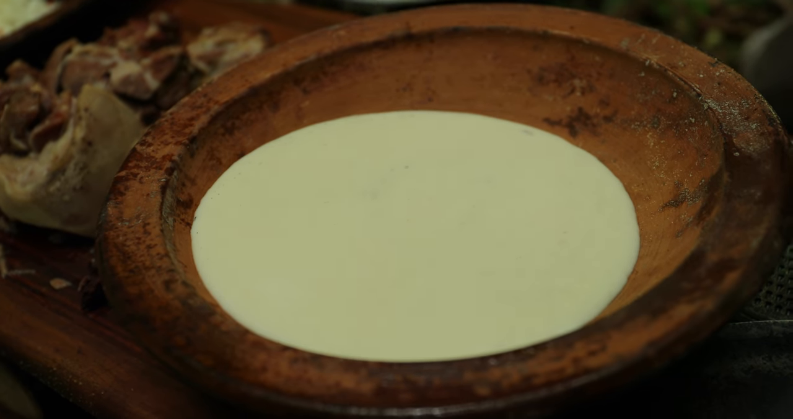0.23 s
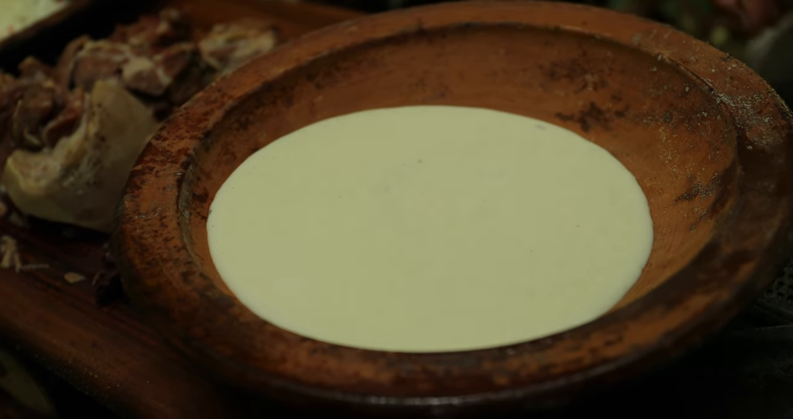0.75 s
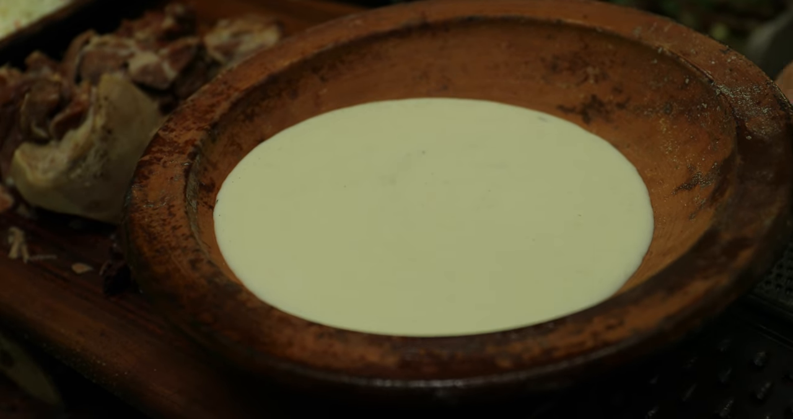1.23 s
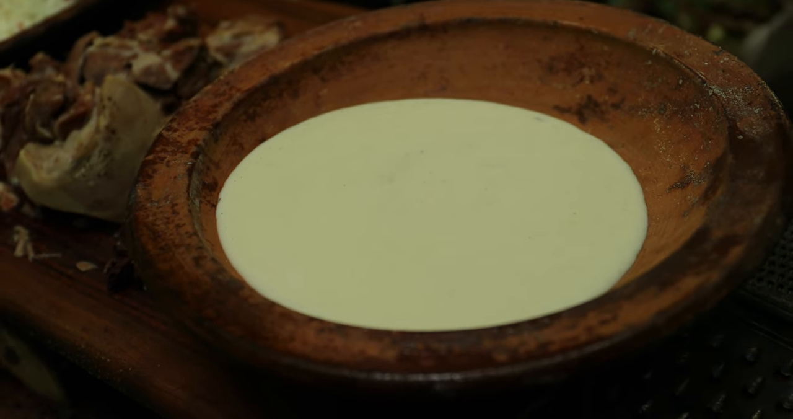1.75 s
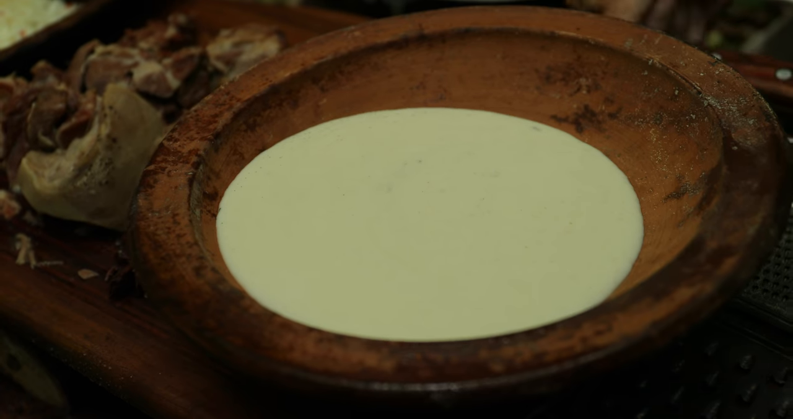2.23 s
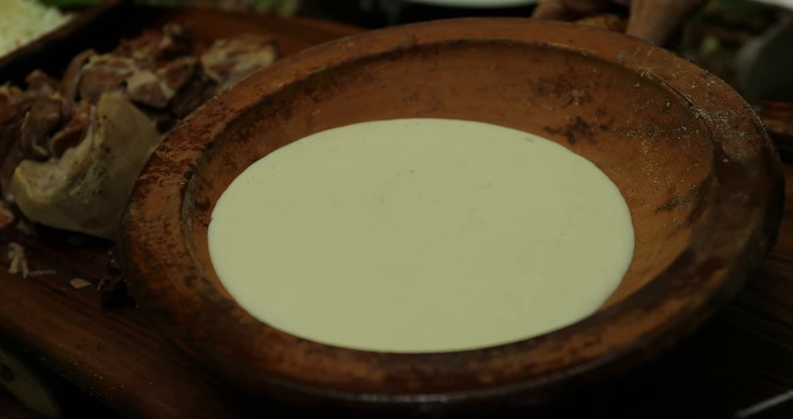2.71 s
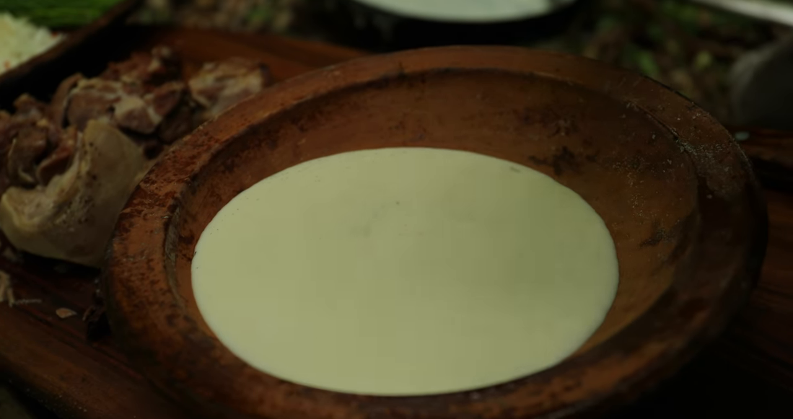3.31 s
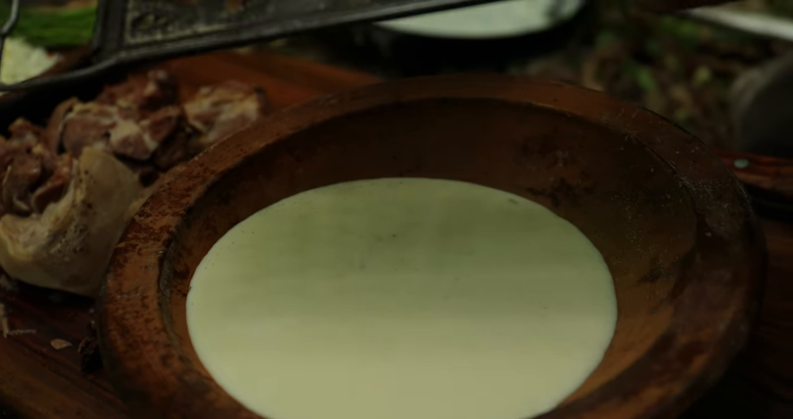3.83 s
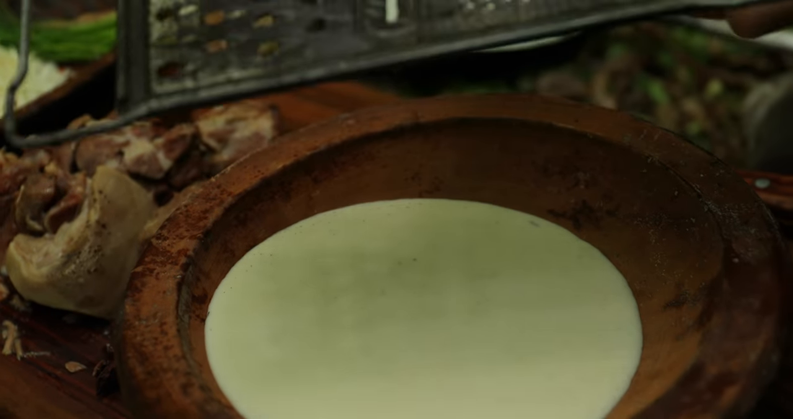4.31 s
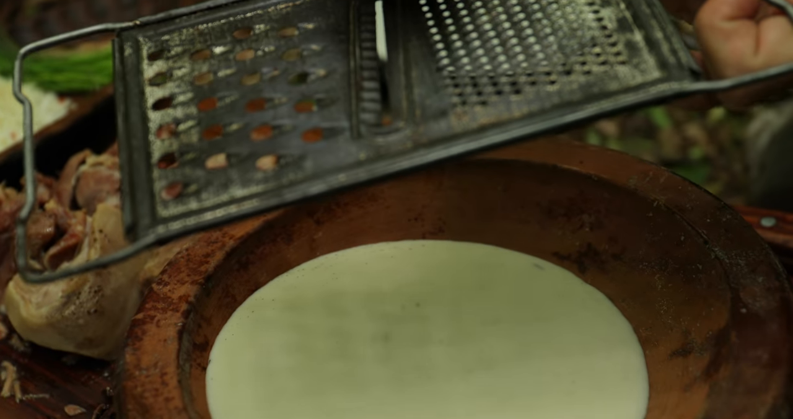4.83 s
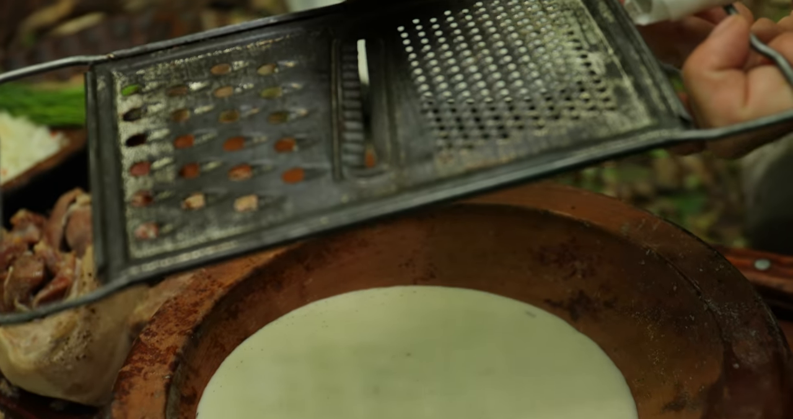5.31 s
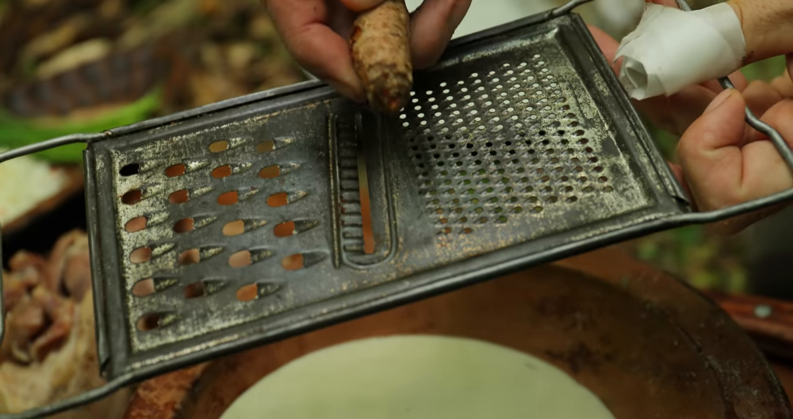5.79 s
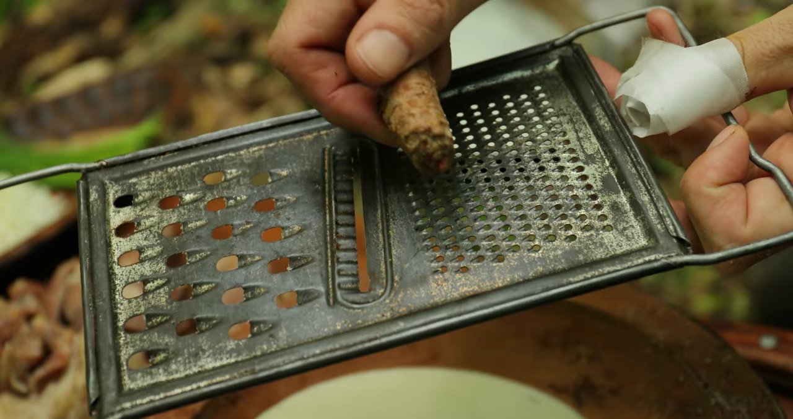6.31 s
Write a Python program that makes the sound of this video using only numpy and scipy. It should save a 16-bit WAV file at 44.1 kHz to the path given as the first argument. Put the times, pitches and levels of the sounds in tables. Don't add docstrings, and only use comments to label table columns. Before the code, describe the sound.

Outdoors at a wooden table, close stereo microphone. A clay dish thuds as a spoon clicks sharply on its rim. A metal pan then drags with a harsh, juddering, gritty scrape, and after a short gap is knocked, shoved and set down in clattering bursts with woody booms. Afterwards only soft air, faint birds, tiny drips and a low engine rumble remain.

```python
import sys
import numpy as np
from scipy import signal
from scipy.fft import rfft, irfft, next_fast_len
from scipy.io import wavfile
from scipy.ndimage import uniform_filter1d, minimum_filter1d, map_coordinates

SR = 44100
rng = np.random.default_rng(int(sys.argv[2]) if len(sys.argv) > 2 else 0)


def unload_audio(sound):
    columns = np.transpose(np.atleast_2d(sound))
    steps = np.round(np.clip(columns, -1, 1) * 32767)
    wavfile.write(sys.argv[1], SR, steps.astype(np.int16))


def boost_factor(decibels):
    exponent = np.asarray(decibels, float) / 20
    return 10 ** exponent


N = 288836
SIDES = np.array([[.5], [-.5]])


def unit(x):
    return x / np.sqrt(np.mean(x ** 2) + 1e-20)


def along(points, hz):
    point_hz, value = np.transpose(points)
    return np.interp(np.log(hz + 1), np.log(point_hz + 1), value)


def strength(rows):
    s, db = np.transpose(rows)
    return boost_factor(np.interp(np.arange(N) / SR, s, db, -150, -150))


def wobble(rate_hz):
    knots = rng.standard_normal(int(N * rate_hz / SR) + 4)
    return map_coordinates(knots, [np.arange(N) * rate_hz / SR])


def filtered(x, response):
    size = next_fast_len(x.shape[-1] + SR // 4)
    spectrum = rfft(x, size) * response(np.fft.rfftfreq(size, 1 / SR))
    return irfft(spectrum, size)[..., :x.shape[-1]]


def add(out, s, x):
    part = out[..., round(s * SR):][..., :x.shape[-1]]
    part += x[..., :part.shape[-1]]


def modes(table, low_hz, high_hz, scatter_db=0, damping=1.):
    mode_hz, width_hz, db = np.transpose(table)[:, :, None]
    gain = boost_factor(db + np.reshape(scatter_db, (-1, 1))) * (mode_hz >= low_hz) * (mode_hz < high_hz)
    gain = gain * (-1) ** np.arange(len(mode_hz))[:, None]

    def response(f):
        soft = 1 / (1 - (f / high_hz) ** 2 + 1.2j * f / high_hz) ** 2
        resonance = 1j * f * width_hz / (mode_hz * mode_hz - f * f + 1j * f * width_hz * damping)
        return soft * np.sum(gain * resonance, axis=0)
    return response


def echoes(x, t60_s):
    tail = rng.standard_normal((2, SR // 2)) * boost_factor(-60 * np.arange(SR // 2) / SR / t60_s)
    return signal.fftconvolve(x[None], tail / np.linalg.norm(tail[0]), axes=1)[:, :N]


# freq_hz, side_minus_mid_db
WIDTH = [(60, 0), (110, -16), (200, -14), (380, -15.5), (700, -11.5), (1290, -17), (2380, -8.5),
         (4400, -5.5), (8120, 0.5), (15000, 0.5)]
# freq_hz, left_minus_right_db
LEAN = [(60, 1.5), (110, -0.5), (200, -1.5), (380, -1), (700, 1), (1290, 1), (2380, 1), (4400, 1),
        (8120, 0), (15000, 1.0)]


def rush(spectrum, patchy_db):
    cells = signal.stft(rng.standard_normal((2, N)), nperseg=512)[2]
    field = rng.standard_normal(cells.shape[1:])
    field = uniform_filter1d(uniform_filter1d(field, 6, 0), 12, 1)
    pair = signal.istft(cells * boost_factor(patchy_db * unit(field)), nperseg=512)[1][:, :N]
    mid, side = filtered(pair, lambda hz: boost_factor(along(spectrum, hz)) * [hz ** 0, boost_factor(along(WIDTH, hz))])
    both = filtered(np.array([mid + side, mid - side]), lambda hz: boost_factor(along(LEAN, hz) * SIDES))
    return both / np.std(mid)


# time_s, strength_db
AIR = [(0, 2), (.31, 0), (.446, 5.5), (.62, 2), (1.4, 2.5), (1.8, 1.5), (2.0, 0.5), (2.95, 3.5), (3.68, 2),
       (4.3, 0), (4.7, 2.5), (5.4, -0.5), (6.2, 0), (6.36, 2), (6.55, 0)]
# freq_hz, level_db_per_hz
AIR_TONE = [(41, -67), (70, 1), (219, -8.5), (396, -14.5), (509, -20.5), (597, -21), (841, -25.5),
            (1240, -25.5), (1360, -23.5), (2290, -26), (3230, -30.5), (4980, -31), (13500, -45),
            (15900, -45)]
BREEZE_SHARE = [0.38, 0.72, 0.81]


def air():
    wide = rush(AIR_TONE, patchy_db=1.5)
    out, breeze = 0, strength(AIR)
    for share, low_hz, high_hz in zip(BREEZE_SHARE, (0, 800, 4000), (800, 4000, 20000)):
        part = filtered(wide, lambda hz: (hz >= low_hz) * (hz < high_hz))
        out = out + breeze ** share * boost_factor(0.44 * wobble(2.9)) * part
    return boost_factor(-42.5) * out


# time_s, level_db
HUM = [(0, -39), (.55, -50), (.64, -33), (.75, -47), (1.85, -44.5), (2.06, -31.5), (2.4, -50), (3.0, -37.5),
       (3.4, -50), (4.2, -38.5), (5.0, -54), (5.07, -20.5), (5.2, -40), (5.7, -35.5), (5.88, -15),
       (6.02, -35.5), (6.16, -32), (6.55, -54)]
HUM_HZ, HUM_WAVER_HZ, HUM_LEFT_DB = 56, 1.5, 3
DRONE_HZ, DRONE_WIDTH_HZ, DRONE_LEFT_DB, DRONE_DB = 41, 6.5, 6, -42


def engine():
    phase = 2 * np.pi * np.cumsum(HUM_HZ + HUM_WAVER_HZ * wobble(5.4)) / SR
    turn = .9 * wobble(2) * SIDES
    hum = strength(HUM) * boost_factor(1.5 + HUM_LEFT_DB * SIDES) * np.sin(phase + turn)
    hum = hum * boost_factor(2 - 5 * np.abs(wobble(4)))
    noise = rng.standard_normal((2, N))
    fuzz = filtered(noise, lambda f: np.exp(-((f - DRONE_HZ) / DRONE_WIDTH_HZ) ** 2))
    return hum + boost_factor(DRONE_DB + DRONE_LEFT_DB * SIDES) * unit(fuzz)


# start_s, peak_db, pitch_hz
DRIPS = [(0.339, -40.5, 1310), (0.73, -34, 1150), (1.391, -41, 1165), (1.479, -44, 1136),
         (1.557, -38, 1890), (4.319, -48, 1690), (4.474, -41, 1160), (4.601, -41, 1065), (4.485, -42, 1170),
         (4.6, -43, 1480), (4.65, -41, 1780), (4.71, -43.5, 936), (4.215, -43, 2340), (.1, -40.5, 1190),
         (4.789, -46, 2290), (4.88, -44, 880), (4.99, -43, 1090), (5.219, -46, 1430), (5.434, -51, 670),
         (5.605, -52, 670), (5.52, -45, 1390), (6.015, -50, 740), (5.205, -45, 700), (5.699, -50, 600),
         (5.857, -46, 1260), (5.889, -53, 710), (5.999, -47, 1210), (6.135, -45, 1020), (6.251, -46, 830),
         (6.289, -43.5, 712), (6.405, -43.5, 1330)]
PATTER_FROM_S, PATTER_PER_S, PATTER_HZ, PATTER_DB = 4.2, 45, 1150, -56


def drips():
    out, t = np.zeros(N), np.arange(SR // 12) / SR
    patter_s = N / SR - PATTER_FROM_S
    draw = rng.random((round(patter_s * PATTER_PER_S), 3))
    start_s = PATTER_FROM_S + draw[:, 0] * patter_s
    level_db = PATTER_DB + 9 * draw[:, 1] ** 2
    pitch_hz = PATTER_HZ * 2 ** (2.4 * draw[:, 2] - 1)
    for s, db, hz in DRIPS + list(zip(start_s, level_db, pitch_hz)):
        life_s = 9 / hz
        shape = np.exp(-t / life_s) * (1 - np.exp(-t / 0.00056))
        add(out, s, boost_factor(db + 1) * shape * np.sin(2 * np.pi * hz * t * (1 + .015 * t / life_s)))
    return out


# freq_hz, level_db, t60_s
FOOT = [(600, 3, 0.022), (1306, -6.5, 0.037), (406, -7, 0.026), (880, -3, .018)]
FOOT_S, FOOT_DB = .2122, -4.5


def foot():
    t = np.maximum(np.arange(N) / SR - FOOT_S, 0)
    ring = sum(boost_factor(db - 60 * t / t60) * np.sin(2 * np.pi * hz * t) for hz, db, t60 in FOOT)
    return boost_factor(FOOT_DB) * (1 - np.exp(-t / 0.00079)) * ring


# start_s, peak_db, freq_hz,
# left_minus_right_db, fade_s
TICKS = [(0.2128, -19, 5760, 8, 0.011), (2.489, -32, 6200, 1, 0.0051), (0.302, -38.5, 6000, 1.5, 0.019),
         (.419, -34.5, 9000, 1.5, 0.021), (0.451, -29, 8000, 3, 0.0081), (0.582, -30, 5200, 2, 0.0046),
         (1.514, -34, 10900, -3, 0.0024), (1.678, -29.5, 10500, 3, 0.0013), (3.45, -41, 13000, 1, .003),
         (3.802, -50, 9000, -20, 0.043), (4.381, -33.5, 4970, 7, 0.004), (4.805, -31, 13500, -2, 0.0018),
         (5.305, -50, 10500, 38, 0.002), (5.694, -27, 10500, 0, 0.0015), (3.74, -47, 9000, -6, 0.011),
         (3.85, -52, 9100, 0, .015), (3.97, -53, 8900, 6, 0.011), (6.275, -37, 3030, 3, 0.028)]


def ticks():
    out, t = np.zeros((2, N)), np.arange(SR // 20) / SR
    for s, db, hz, pan_db, fade_s in TICKS:
        burst = rng.standard_normal((2, len(t))) * np.exp(-t / abs(fade_s))
        snap = filtered(burst, lambda f: (1j * f * hz / (hz * hz - f * f + 1.1j * f * hz)) ** 2)
        add(out, s, boost_factor(db + pan_db * SIDES) * snap / np.abs(snap).max())
    return out


# freq_hz, level_db, t60_s
RIM = [(1330, -8, 0.041), (1430, -11.5, 0.086), (1500, 1.5, 0.024), (1696, -24, 0.27), (2050, -5, 0.019),
       (2350, -12.5, 0.051), (2280, -28, 0.27), (2470, -28, 0.16), (2800, -22, 0.025), (2970, -22, 0.049),
       (4900, -27, 0.037)]
# start_s, peak_db
SPOON = [
    (0.2222, -3),
    (0.2292, -20),
    (0.2338, -24),
]
HUSH_S, HUSH_DB_PER_S = 0.308, 700


def spoon():
    out, t = np.zeros(N), np.arange(SR // 3) / SR
    for s, db in SPOON:
        ring = sum(boost_factor(level - 60 * t / t60) * np.sin(2 * np.pi * hz * t) for hz, level, t60 in RIM)
        crack = 0.022 * boost_factor(-60 * t / 0.021) * rng.standard_normal(len(t))
        add(out, s, boost_factor(db + 3) * (ring * (1 - np.exp(-t / .0008)) + crack))
    return out * boost_factor(-HUSH_DB_PER_S * np.maximum(np.arange(N) / SR - HUSH_S, 0))


# freq_hz, width_hz, level_db
PAN = [(326, 34, -3), (514, 31, -7.5), (860, 30, -11), (1210, 51, -11), (1590, 110, 2), (2100, 123, -0.5),
       (2585, 340, -8), (2846, 36, -4), (3140, 105, -5), (3760, 40, -0.5), (4200, 180, -14),
       (4600, 130, -5.5), (4820, 42, 1.5), (5030, 52, -4), (6030, 95, -1.5), (6700, 160, -7.5),
       (7400, 53, -5.5), (7750, 180, -9.5), (5670, 48, -9.5)]
CONTACT_SCATTER_DB, CONTACT_MOVES_HZ = 4, 22


def sliding(grit, band, damping):
    share = boost_factor(8 * np.array([wobble(CONTACT_MOVES_HZ) for _ in range(3)]))
    share = share / np.linalg.norm(share, axis=0)
    spots_db = CONTACT_SCATTER_DB * rng.standard_normal((3, len(PAN)))
    out = 0
    for gain, spot_db in zip(share, spots_db):
        out = out + unit(filtered(gain * grit, modes(PAN, *band, spot_db - spot_db.mean(), damping)))
    return out / np.sqrt(3)


# low_hz, high_hz
BANDS = [(0, 1500), (1500, 3500), (3500, 9000)]
# freq_hz, level_db_per_hz
GRIT = [(1500, -36), (2500, -9), (4000, 21), (6500, 19), (8000, 20), (12000, 7), (15600, -3), (16500, -50)]
# time_s, pressure_db, speed (0-1)
DRAG = [
    (0.66, -46.5, 1),
    (0.738, -50.5, 0),
    (0.848, -39.5, 0.55),
    (0.9, -35.5, 0.54),
    (0.975, -22, 0.31),
    (1.048, -27, 0.54),
    (1.116, -28, 0.73),
    (1.2, -32.5, 0.81),
    (1.248, -37.5, 0.57),
]
# start_s, length_s, pressure_db, speed (0-1)
SHOVES = [
    (2.008, 0.14, -26.5, 0),
    (2.281, 0.16, -25.5, 0.03),
    (2.477, 0.1, -32, 0.04),
    (2.676, 0.22, -31, 0),
]
SHOVE_RISE_S, SHOVE_FALL_DB = 0.064, 17
# time_s, extra_scratch_db, fade_s
BITES = [
    (.911, 12, .006),
    (0.966, 20, .003),
    (1.024, 8, 0.0065),
    (1.038, 7, .012),
    (1.066, -6, .01),
    (1.099, 5, 0.01),
    (1.131, 1, 0.017),
    (1.19, 7, 0.015),
    (1.24, 8.5, .006),
]
LIFT_DB_PER_S = [350, 500, 1500, 2000]
RESTING_DB = [1, -8, -23, -51]
FASTER_DB = [-3.5, 6, 23, 55]


def drag():
    slow, fine = wobble(40), wobble(350)
    clumps = boost_factor([slow + 3.3 * np.roll(fine, 5000 * k) for k in range(4)])
    grit = clumps * rng.standard_normal((4, N))
    rings = [unit(sliding(grit[k], band, damping=0.82 + 0.089 * k * k)) for k, band in enumerate(BANDS)]
    scratch = unit(filtered(grit[3], lambda hz: boost_factor(along(GRIT, hz))))
    rings[2] = unit(rings[2] + scratch)
    rings.append(0.35 * unit(filtered(scratch, lambda hz: (hz / 12000) ** 2)))
    strokes = [DRAG]
    for s, length, db, speed in SHOVES:
        strokes.append([(s, db - 8.5, speed), (s + SHOVE_RISE_S, db, speed),
                        (s + length, db - SHOVE_FALL_DB, speed)])
    level, t = 0, np.arange(N) / SR
    for stroke in strokes:
        s, db, speed = np.transpose(stroke)
        lift_db = np.c_[LIFT_DB_PER_S] * np.maximum(t - s[-1], 0)
        pressure_db = np.interp(t, s, db, left=-150) - lift_db
        speed_db = np.c_[RESTING_DB] + np.c_[FASTER_DB] * np.interp(t, s, speed)
        level = level + boost_factor(pressure_db + speed_db)
    bite = 1
    for s, db, fade_s in BITES:
        bite = bite + boost_factor(db) * (t >= s) * np.exp(-np.abs(t - s) / abs(fade_s))
    return np.sum(level * rings * [t ** 0, t ** 0, bite, bite], axis=0)


# freq_hz, width_hz, level_db
BOARD = [(271, 63, 4.5), (520, 70, -3.5), (738, 26, 3), (900, 41, -5.5), (1098, 57, -4), (1310, 41, -5.5),
         (1542, 25, -10)]
# start_s, peak_db, hardness_db, favoured_hz
KNOCKS = [(0.664, -29, -6, 480), (2.01, -21.5, -14.5, 910), (2.042, -27, -18, 480),
          (2.057, -18, -10.5, 1500), (2.068, -16, -20, 328), (2.075, -18, -15, 1190),
          (2.092, -17.5, -20, 720), (2.108, -21, -18, 1110), (2.284, -13.5, 1.5, 506),
          (2.302, -12.5, -7, 920), (2.3442, -18, 6.5, 686), (2.359, -24, -1, 900), (2.364, -2.5, -30, 738),
          (2.396, -22, -11.5, 890), (2.482, -5, -38, 770), (2.5, -10.5, -17.5, 730), (2.521, -19, -15, 501),
          (2.541, -24, -46, 730), (2.6892, -15.5, -6, 900), (2.703, -4.5, -18, 600),
          (2.711, -3.5, -30, 560), (2.7504, -18, -4, 490), (2.784, -3.5, -41, 520), (2.808, -4.5, -31, 700),
          (2.815, -9, -36, 514), (2.874, -22.5, -36, 320), (2.884, -24, -26, 630), (3.801, -35, -1, 970)]
# start_s, peak_db, upper_modes_db, edge_db, favoured_hz
JUDDER = [(0.82, -30, -5, -6, 710), (0.88, -32, -17, -11, 710), (0.897, -38, 2, -1, 1130),
          (0.911, -21, 1.5, 5, 1130), (0.939, -15, 0, -12, 860), (0.9436, -16.5, 4.5, -5, 340),
          (.955, -16, 0, -6, 1200), (.992, -21.5, 3, -1, 1200), (0.9664, -17, 3, 7.5, 860),
          (0.98, -17, 5, -4, 450), (1.015, -19, 4, -5, 496), (1.039, -24, -2, 1, 527),
          (1.07, -27, -11, -6, 525), (1.098, -32, -2, 10.5, 530), (1.135, -37, 10, 19, 536),
          (1.164, -46, 0, 6, 490), (1.19, -41, 12, -1, 1180), (1.245, -27, -22, -16, 1100)]
UPPER_DB, UPPER_SHARE = 2, 0.59
CONTACT_S, CATCH_S, METAL_S = 0.0092, .006, 0.012


def knocks():
    out, t = np.zeros(N), np.arange(SR // 4) / SR
    contacts = []
    for s, db, hard_db, hz in KNOCKS:
        contacts.append((s, db, UPPER_DB + UPPER_SHARE * hard_db, hard_db, hz, CONTACT_S))
    contacts += [(*row, CATCH_S) for row in JUDDER]
    for s, db, upper_db, edge_db, hz, contact_s in contacts:
        rattle = rng.standard_normal((4, len(t))) * np.exp(-t / contact_s)
        rattle[1:] *= np.exp(-t / METAL_S)
        rattle[:2, 0] = 12
        favour_db = np.append(-4 * np.abs(np.log2(np.transpose(BOARD)[0] / hz)), 0)
        scatter_db = 3 * rng.standard_normal(len(PAN))
        spot = [(hz, 0.13 * hz, -9)]
        thud = filtered(rattle[0], modes(BOARD + spot, 0, 2080, favour_db, damping=1.72))
        upper = filtered(rattle[1], modes(PAN, *BANDS[1], scatter_db, damping=1.3))
        edge = filtered(rattle[2], modes(PAN, *BANDS[2], scatter_db, damping=2.6))
        burst = rattle[3] * np.exp(-t / 0.0013)
        crack = filtered(burst, lambda f: boost_factor(along(GRIT, f)) / (1 + (f / 9000) ** 4))
        edge = unit(edge) + .5 * unit(crack)
        for ring, rel_db in ((thud, 0), (upper, upper_db), (edge, edge_db)):
            add(out, s, boost_factor(db + rel_db) * ring / np.abs(ring).max())
    return out


# start_s, freq_hz, level_db, t60_s
LINGER = [(2.876, 312, -19.5, 0.13), (2.885, 580, -32, 0.078), (2.786, 350, -15.5, 0.13),
          (2.81, 310, -19.5, 0.21), (2.82, 1000, -20.5, 0.065), (2.54, 260, -24.5, .15),
          (2.3, 501, -28, .15), (2.706, 3755, -33, 0.13), (2.345, 4000, -15, 0.045), (.677, 890, -42, 0.21),
          (1.155, 2830, -30, 0.16), (1.19, 5500, -33, 0.13), (1.188, 6080, -29, 0.12),
          (1.245, 3750, -49, 0.79), (1.238, 1093, -26.5, 0.11), (2.305, 1100, -28, 0.26),
          (2.707, 1700, -23, 0.078), (2.286, 2110, -23, 0.13), (2.286, 6080, -30, 0.19),
          (2.29, 3795, -27, 0.23), (2.366, 490, -25, 0.26), (2.398, 2214, -38, 0.24),
          (1.1, 4860, -25, 0.11), (1.105, 520, -29, 0.27), (2.752, 290, -19.5, 0.22),
          (2.5, 2075, -27, 0.11), (2.712, 2840, -29, 0.12), (2.752, 3800, -33.5, 0.13),
          (2.751, 5900, -30, 0.027),
          (2.306, 1230, -33, 0.31), (2.372, 890, -28.5, .22), (2.372, 1330, -32, .2),
         (2.365, 710, -10, 0.064), (2.043, 335, -22, .12), (2.098, 750, -22, .07), (2.012, 900, -27, .07),
         (2.074, 1170, -25, 0.044), (2.302, 1050, -17, .04), (2.068, 415, -23, .08),
         (2.785, 910, -12, 0.033), (2.4825, 335, -13, 0.054), (2.4822, 1170, -13.5, 0.039),
         (2.483, 750, -12.5, .12), (2.498, 300, -20, 0.08), (2.54, 310, -27, 0.061),
         (2.704, 600, -9, 0.047), (2.704, 304, -13, .08),
          (.665, 1580, -32.5, 0.07), (.665, 2950, -40, 0.048), (.82, 1565, -35, 0.18),
          (.911, 5040, -25, .05), (.944, 1574, -16, 0.068), (0.943, 3100, -23, .05), (.944, 2560, -20, .05),
          (.967, 5030, -28, .04), (.981, 3700, -24, .03), (1.135, 1590, -28, .1), (1.1, 3140, -32, .1),
          (1.04, 2600, -31, .1), (2.2845, 5950, -13, .025), (2.302, 5860, -24, .05),
          (2.303, 2113, -21, .06), (2.288, 2821, -27, 0.13), (2.288, 4861, -39, .09),
          (2.345, 5930, -16, .025), (2.5, 1590, -26, .06), (2.01, 1600, -28, .07), (2.056, 1590, -23, .08),
          (2.093, 1610, -24.5, 0.096), (2.062, 1950, -22, .04), (2.346, 2830, -29.5, .12),
          (2.36, 2290, -27, 0.089), (2.71, 2140, -21, .05), (2.751, 4840, -25, .04),
          (2.751, 2190, -32, 0.043), (2.751, 3100, -32, .05), (2.752, 1585, -30, 0.1),
          (1.251, 1790, -42, .36),
    (2.36, 4560, -23, .035),
]


def linger():
    out, t = np.zeros(N), np.arange(SR // 3) / SR
    for s, hz, db, t60_s in LINGER:
        add(out, s, boost_factor(db - 60 * t / t60_s) * (1 - np.exp(-t / 0.00083)) * np.sin(2 * np.pi * hz * t))
    return out


# start_s, peak_db, freq_hz, fade_s
SNAPS = [
    (0.9445, -9, 1920, 0.0028),
    (0.9815, -4, 1650, .003),
    (1.016, -17, 2000, 0.0022),
    (2.064, -13, 1620, 0.0022),
    (2.0923, -16.5, 1640, 0.0018),
    (2.2877, -14, 2100, .0015),
    (2.302, -15, 1810, 0.0012),
    (2.7046, -18, 1340, 0.0051),
    (2.8175, -17.5, 1580, 0.0047),
    (2.6902, -19, 3000, 0.0017),
]


def snaps():
    out, t = np.zeros(N), np.arange(SR // 20) / SR
    for s, db, hz, fade_s in SNAPS:
        push = np.exp(-t / abs(fade_s)) * np.sin(2 * np.pi * hz * t) + 6.7 * np.exp(-t / 0.00059)
        scatter_db = 3 * rng.standard_normal(len(PAN))
        ring = filtered(push, modes(PAN, 700, 5800, scatter_db, damping=2.4))
        add(out, s, boost_factor(db) * ring / np.abs(ring).max())
    return out


# start_s, length_s, first_hz, last_hz, level_db
SONG = [(1.512, 0.034, 5300, 3700, -56), (1.547, 0.083, 3720, 3740, -54.5), (1.662, 0.177, 4200, 4250, -59),
        (1.841, 0.2, 4250, 4350, -59.5), (2.44, .1, 5580, 5750, -56.5), (2.52, 0.14, 6100, 6300, -62),
        (2.58, .1, 5500, 5800, -61), (2.622, .06, 6600, 6600, -60), (2.952, 0.073, 4290, 4300, -54),
        (3.064, 0.062, 5210, 4530, -51), (3.088, 0.11, 4600, 4600, -57), (3.439, 0.086, 5220, 5200, -54.5),
        (3.475, 0.057, 5900, 6130, -60), (3.55, 0.085, 5480, 5400, -56), (3.602, 0.094, 4600, 4700, -51.5),
        (3.798, 0.15, 5000, 4800, -59), (3.789, .15, 4220, 3980, -60.5)]
# start_s, length_s, first_hz, last_hz, level_db
WHISTLE = [(1.633, 0.13, 3760, 3696, -53.5), (2.411, 0.024, 6850, 6630, -57), (2.6, 0.015, 4900, 4930, -55),
           (2.842, 0.032, 3870, 3853, -53), (2.89, .03, 3870, 3840, -60), (3.214, 0.19, 4370, 4330, -61),
           (3.22, 0.1, 4880, 4870, -62), (3.93, .15, 5230, 5150, -67), (4.297, 0.14, 1704, 1704, -60),
           (4.412, 0.1, 2100, 2088, -60.5), (4.78, 0.047, 2330, 2350, -58.5), (4.55, 0.12, 2160, 2050, -65),
           (6.388, 0.089, 1346, 1340, -62.5), (6.07, .08, 1375, 1385, -70), (6.218, 0.11, 1420, 1400, -66),
           (6.521, 0.034, 1450, 1450, -55)]
SONG_WAVER, WHISTLE_WAVER = .036, .009


def birds():
    out = np.zeros(N)
    notes = [(*n, SONG_WAVER) for n in SONG] + [(*n, WHISTLE_WAVER) for n in WHISTLE]
    for s, length_s, first_hz, last_hz, db, waver in notes:
        u = np.arange(round(length_s * SR)) / (length_s * SR)
        flutter = map_coordinates(rng.standard_normal(80), [u * length_s * 150])
        pitch_hz = first_hz + (last_hz - first_hz) * u + waver * last_hz * flutter
        tone = np.sin(2 * np.pi * np.cumsum(pitch_hz) / SR)
        add(out, s, boost_factor(db + 8.0) * np.sin(np.pi * u) ** 0.036 * tone)
    return .3 * out + echoes(out, t60_s=.32)


OPPOSED_HZ = 8500


def scene():
    contacts = foot() + drag() + knocks() + linger() + snaps()
    pan = filtered(contacts, lambda hz: (1j * hz / (170 + 1j * hz)) ** 2)
    near = filtered(pan, lambda hz: np.exp(-1j * np.pi * (hz / OPPOSED_HZ) ** 1.15 * SIDES))
    glints = filtered(echoes(pan, t60_s=0.012), lambda hz: hz / (hz + 7000))
    tap = spoon()
    room = boost_factor(-20) * echoes(pan + tap, t60_s=0.13) + boost_factor(-2.5) * glints
    return air() + engine() + drips() + ticks() + near + tap + room + birds()


def low_pass(x):
    return signal.sosfilt(signal.butter(12, 16510, fs=SR, output="sos"), x)


def record(dry):
    over = np.maximum(np.abs(dry).max(axis=0) / .45, 1)
    hold = round(.078 * SR)
    gain = minimum_filter1d(over ** -.55, hold, origin=hold // 2 - 1)
    late = np.pad(uniform_filter1d(gain, size=160), (120, 0), mode="edge")[:N]
    level = filtered(dry, lambda hz: hz < 15800) * late
    return low_pass(level / (1 + np.abs(level / 0.74) ** 5) ** (1 / 5))


dry = scene()
out = record(dry)
unload_audio(out)
```